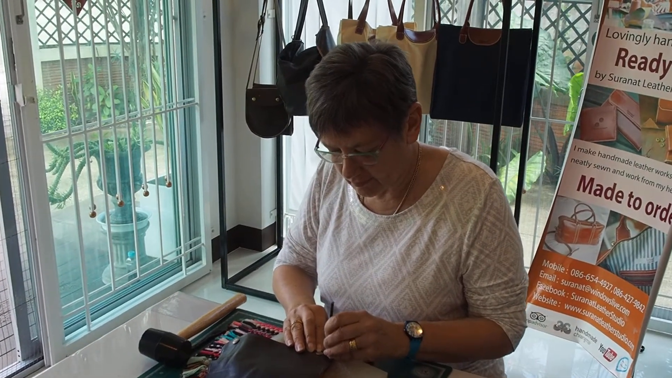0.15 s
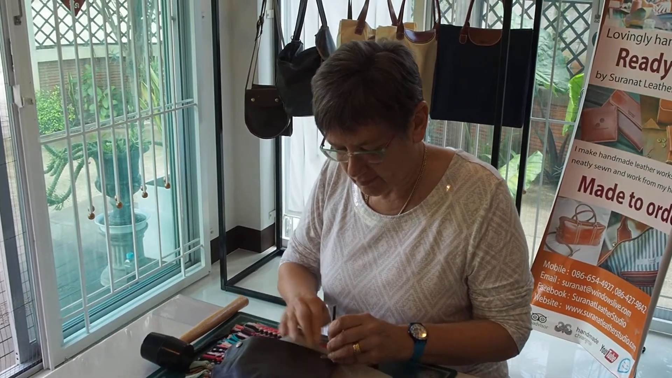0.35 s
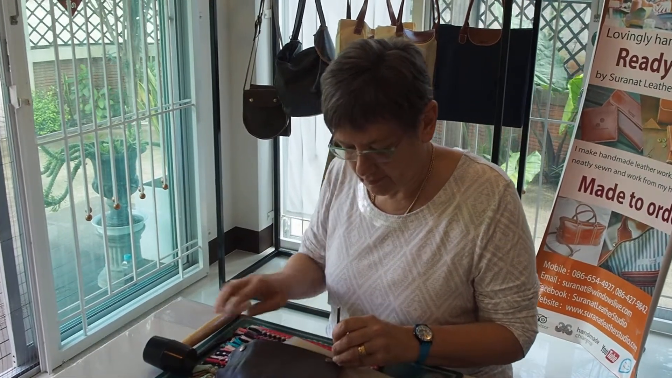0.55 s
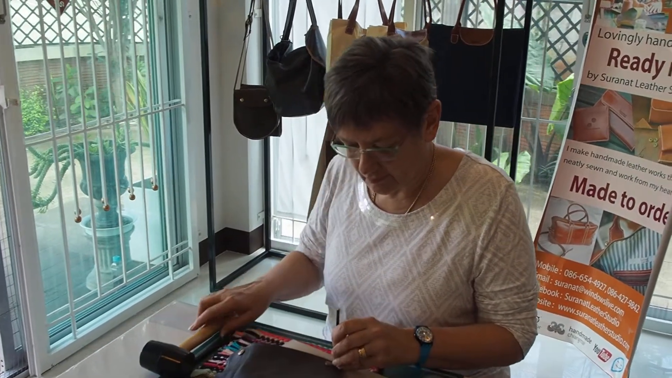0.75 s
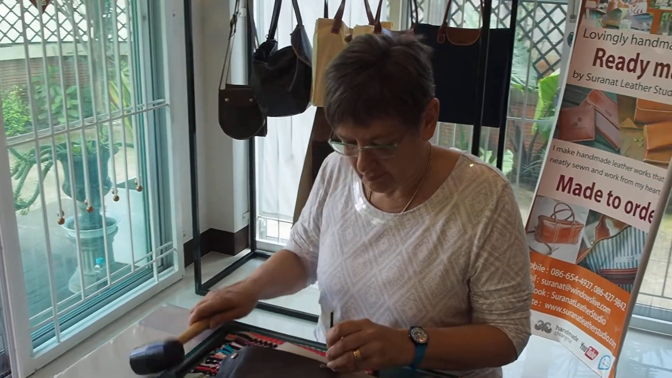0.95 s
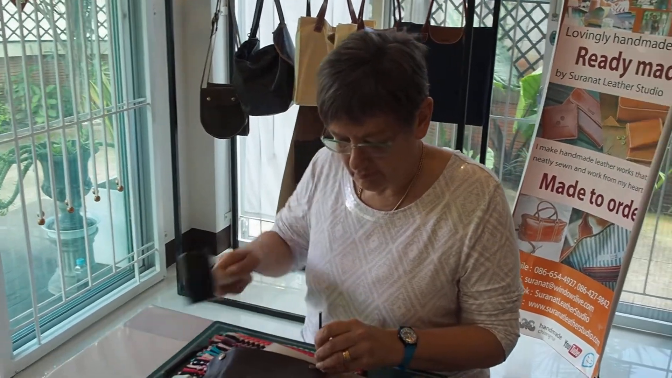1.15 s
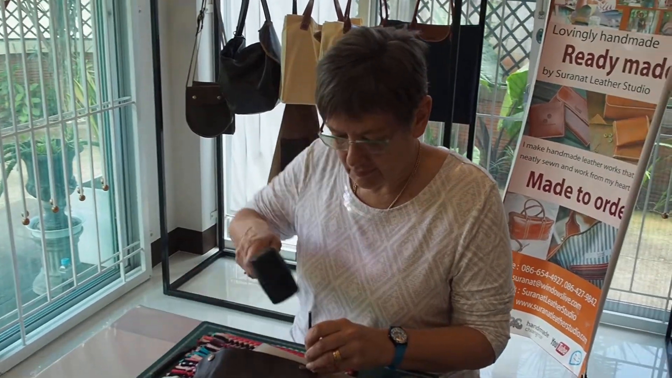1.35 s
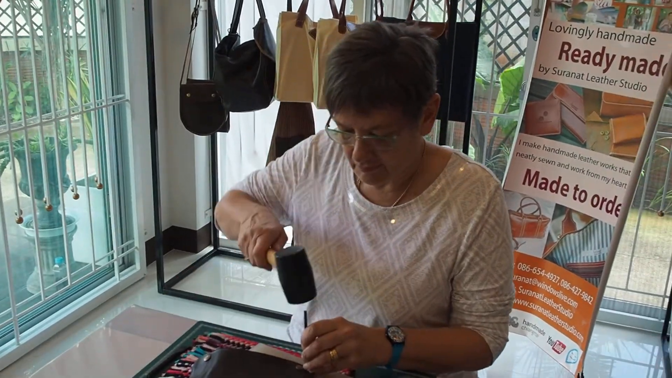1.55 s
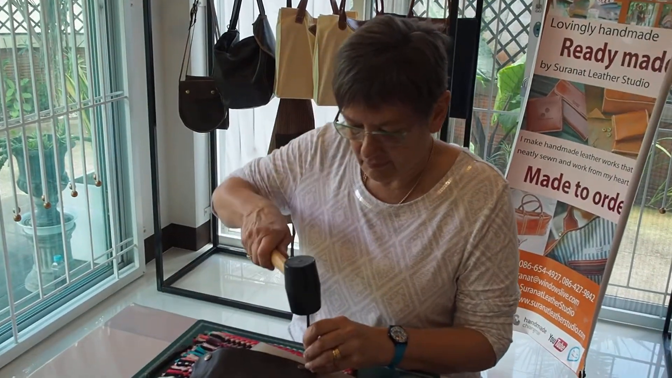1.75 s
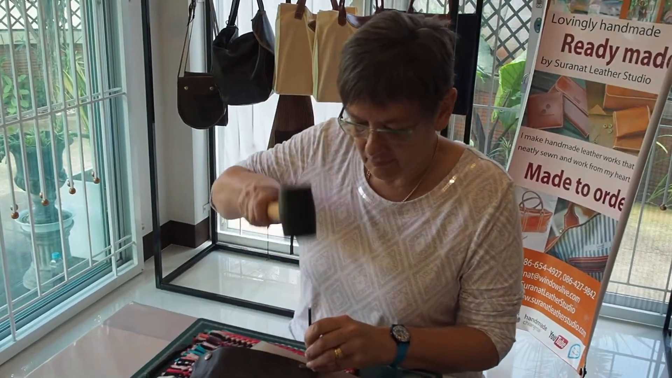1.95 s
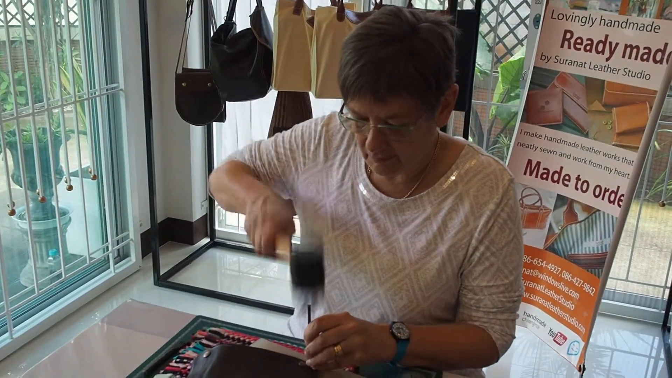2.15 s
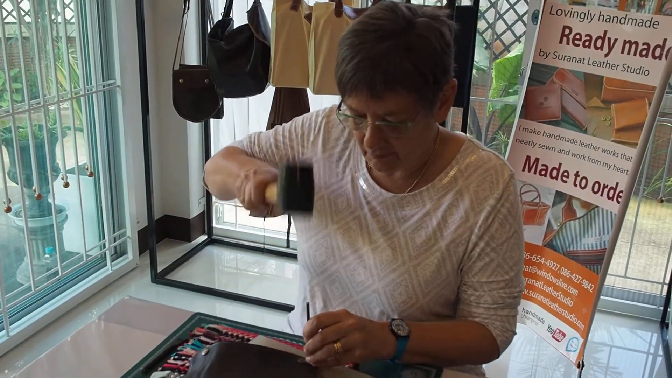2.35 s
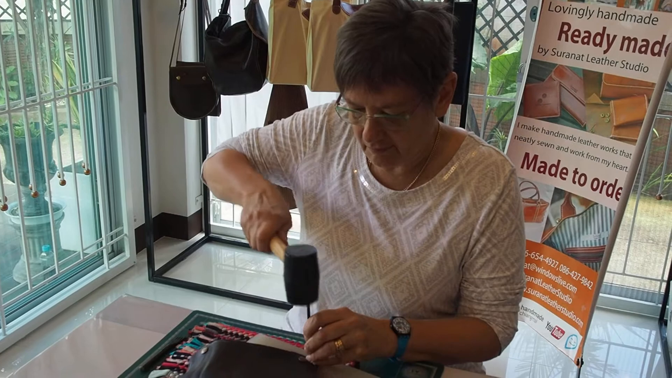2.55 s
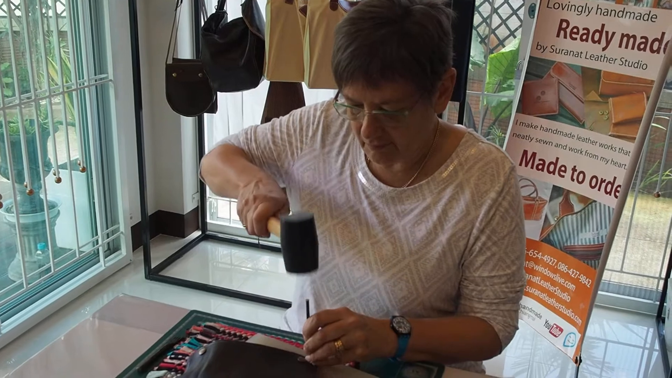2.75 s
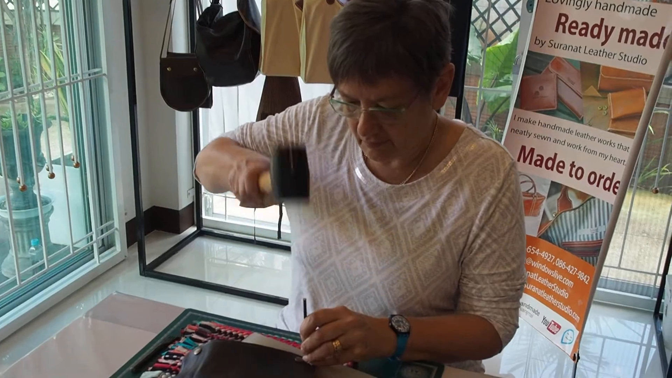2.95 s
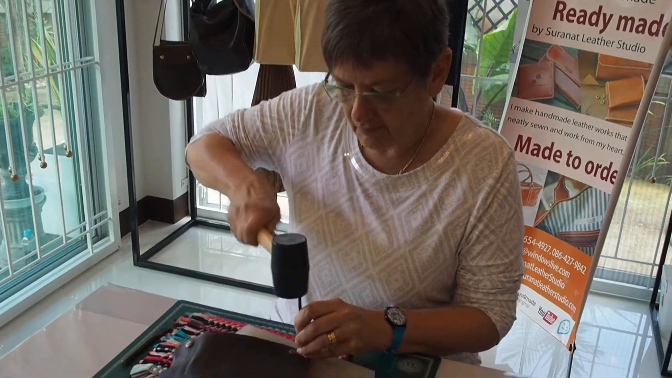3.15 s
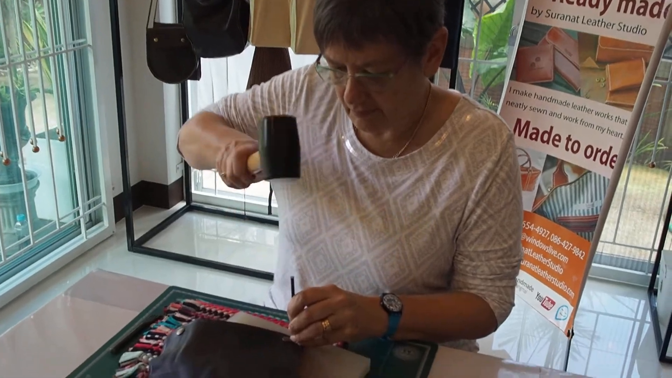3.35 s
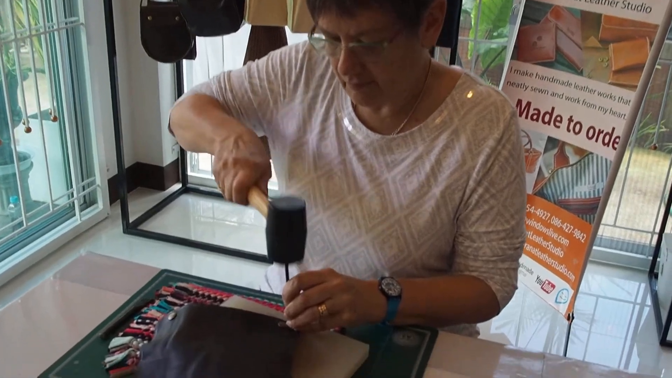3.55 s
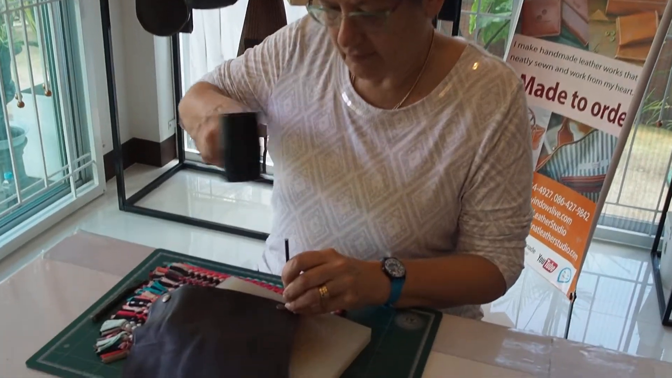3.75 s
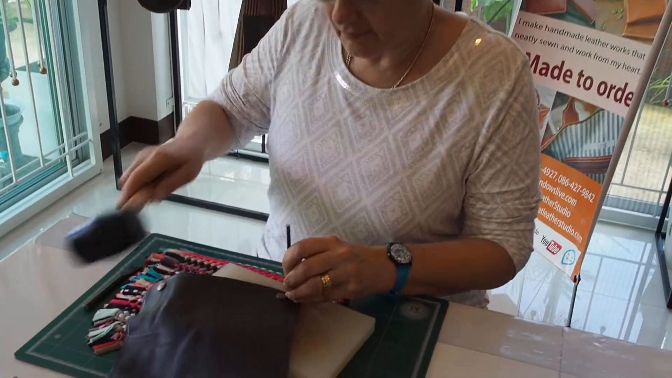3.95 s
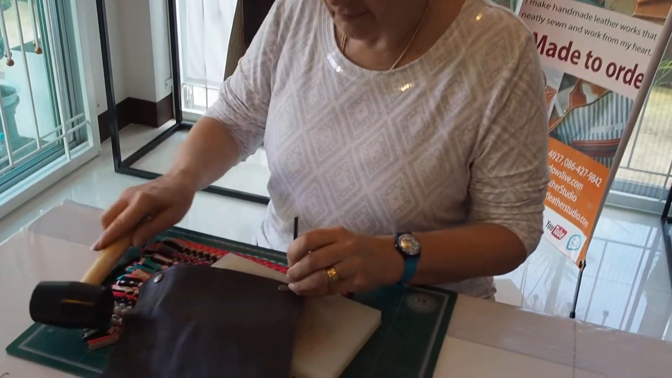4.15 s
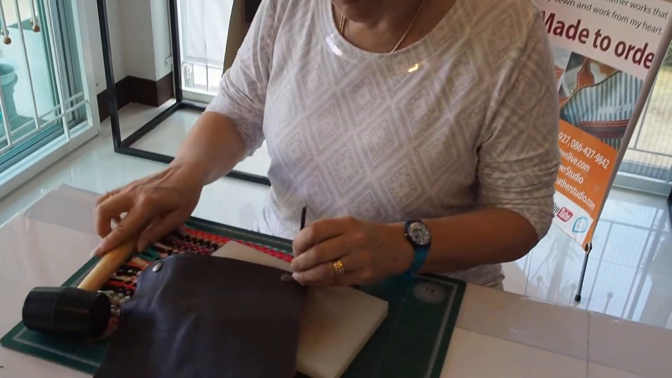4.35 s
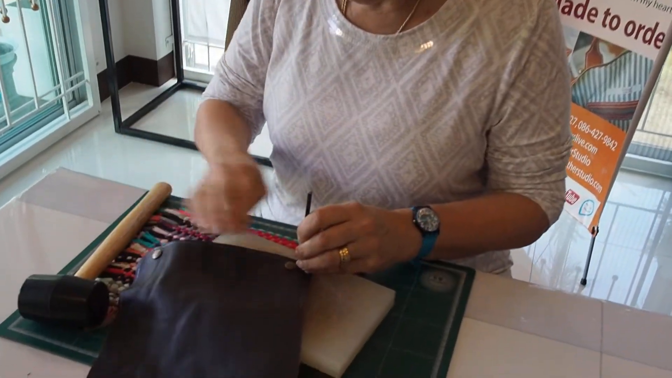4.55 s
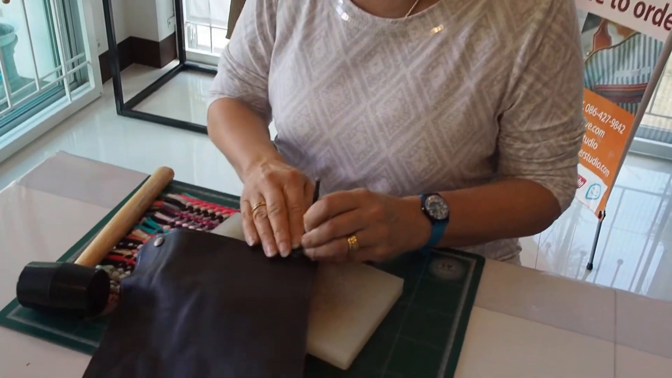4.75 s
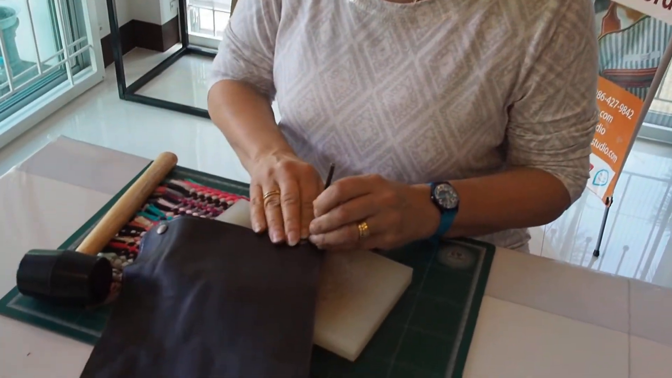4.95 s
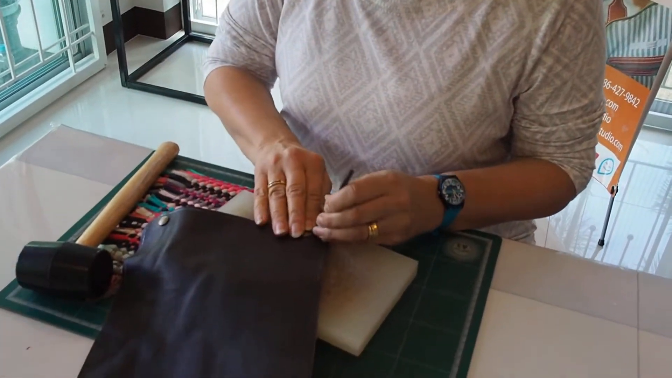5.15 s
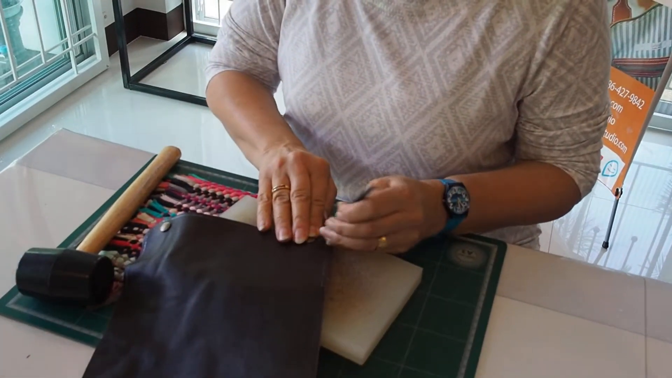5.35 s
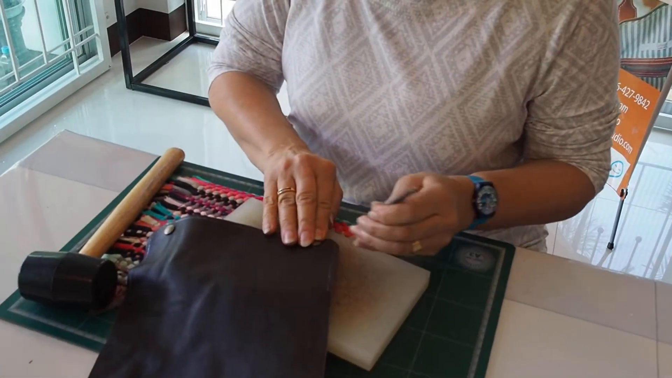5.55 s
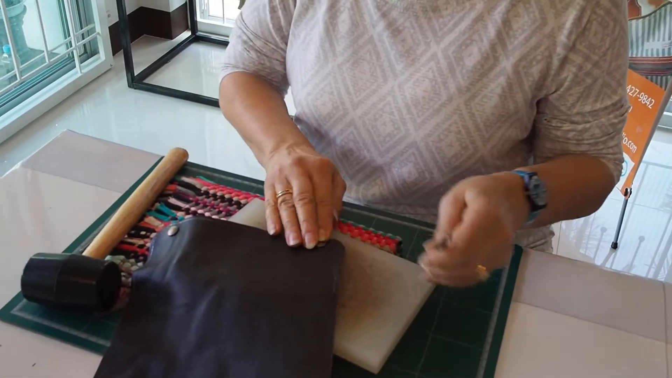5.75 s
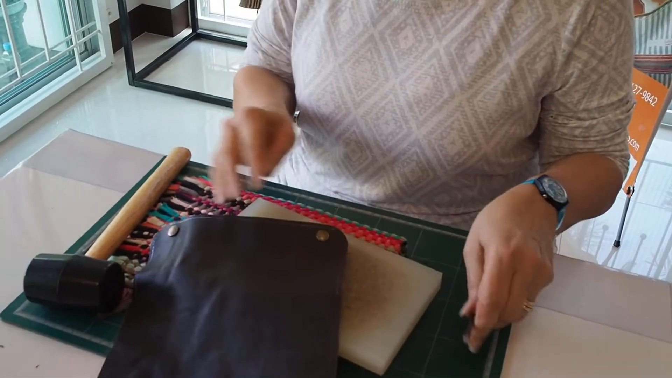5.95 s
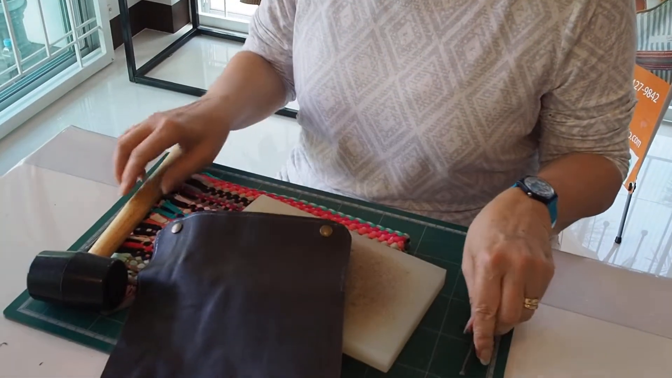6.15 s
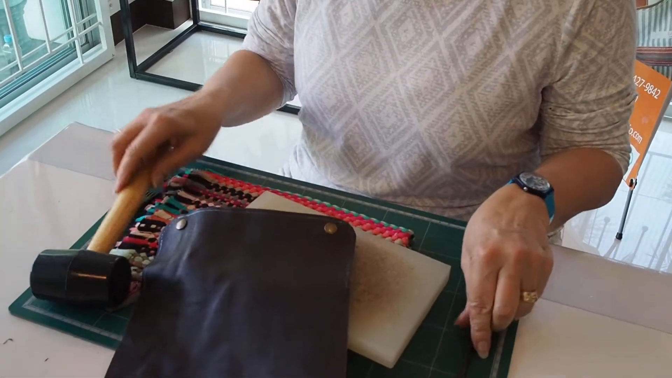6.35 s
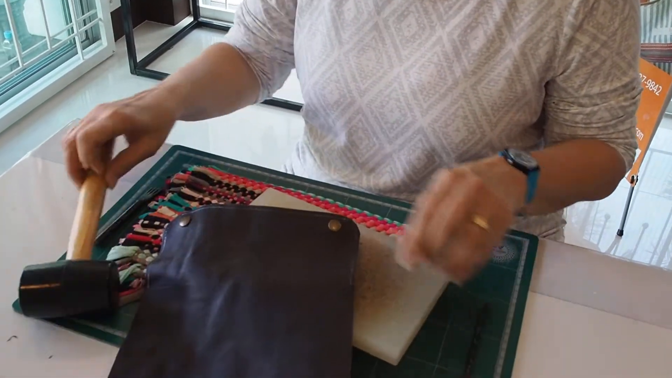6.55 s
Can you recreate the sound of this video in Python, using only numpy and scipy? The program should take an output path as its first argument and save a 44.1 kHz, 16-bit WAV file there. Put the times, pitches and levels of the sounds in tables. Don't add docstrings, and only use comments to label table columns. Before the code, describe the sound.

Quiet street wash and a low truck rumble lie under small metallic rattles and a light tap. Four sharp, overloaded mallet knocks follow, each with a woody board note, low table boom and short hard-room tail. A steady motor hum swells in. The mallet head and handle clunk down, tools tick, a hand thuds on the table and the mallet is handled again, heard on a close stereo microphone that ducks after blows.

```python
import sys
import numpy as np
from scipy import signal
from scipy.io import wavfile
from scipy.ndimage import uniform_filter1d

SR = 44100
rng = np.random.default_rng(int(sys.argv[2]) if len(sys.argv) > 2 else 0)


def attenuation_scalar(level_db):
    decades = np.asarray(level_db, float) / 20
    return 10 ** decades


def int16_out(signal):
    q = np.round(np.clip(np.atleast_2d(signal).T, -1, 1) * 32767)
    wavfile.write(sys.argv[1], SR, q.astype(np.int16))


N = 295351


def evened(x):
    return x / np.sqrt(np.mean(x ** 2) + 1e-20)


def read(points, hz):
    f, value = np.transpose(points)
    return np.interp(np.log(hz + 1), np.log(f + 1), value)


def add(mix, s, sound):
    part = mix[round(s * SR):][:len(sound)]
    part += sound[:len(part)]


def ring(modes, seconds, rise=1e-4):
    t = np.arange(int(seconds * SR)) / SR
    sines = sum(attenuation_scalar(db - 60 * t / t60) * np.sin(2 * np.pi * hz * t) for hz, db, t60 in modes)
    return sines * (1 - np.exp(-t / rise))


def diffuse(length, size, level_db):
    # f/Hz, correlation
    likeness = [(30, 0.97), (70, 0.88), (300, 0.96), (700, 0.9), (1400, 0.74), (2100, 0.38), (3800, -0.67),
                (6000, 0.11)]
    hz = np.fft.rfftfreq(size, 1 / SR)[:, None]
    t = np.arange(4 * length // size + 5) * size / 4 / SR
    a, b, c, d = rng.standard_normal((len(t), len(hz), 4)).T
    same = np.clip(read(likeness, hz), -1, 1)
    left = a + 1j * b
    right = same * left + np.sqrt(1 - same ** 2) * (c + 1j * d)
    spectra = np.array([left, right]) * attenuation_scalar(level_db(hz, t))
    return signal.istft(spectra, nperseg=size, noverlap=3 * size // 4)[1][:, :length]


def street_wash():
    # f/Hz, level/dB per Hz
    wash_colour = [(50, -42), (90, 0.5), (180, 1), (250, -8), (350, -4), (1050, 0.77), (2100, -9.5),
                   (16000, -51)]

    def level_db(hz, t):
        patches = uniform_filter1d(rng.standard_normal((len(hz), len(t))), 14, 0)
        patches = uniform_filter1d(patches, 12, 1)
        return read(wash_colour, hz) + 0.97 * evened(patches)

    return attenuation_scalar(-35.5) * evened(diffuse(N, 1024, level_db))


def truck():
    # t/s, engine note f/Hz, rumble level/dB
    passing = [(0, 70, -51), (1.8, 69.4, -46), (2.501, 72, -41.5), (3.8, 72, -38.5), (4.5, 85.9, -40),
               (6.7, 80.4, -39)]
    # f/Hz, level/dB per Hz
    rumble_colour = [(30, -5), (60, -50), (84, 6.5), (110, -0.5), (145, 1.5), (200, -15), (260, -76),
                     (400, -42)]
    engine_db, engine_width_hz = -6.5, 5.2
    sway = 0.23
    t = np.arange(N) / SR
    s, engine_hz, rumble_db = np.transpose(passing)
    rumble = evened(diffuse(N, 4096, lambda hz, t: read(rumble_colour, hz)))
    r = np.exp(-np.pi * engine_width_hz / SR)
    noise = rng.standard_normal(N) + 1j * rng.standard_normal(N)
    waver = signal.lfilter([1], [1, -2 * r, r * r], noise)
    phase = 2 * np.pi * np.cumsum(np.interp(t, s, engine_hz)) / SR
    engine = evened((waver * np.exp(1j * (phase + sway * np.array([[1], [-1]])))).real)
    return attenuation_scalar(np.interp(t, s, rumble_db)) * (rumble + attenuation_scalar(engine_db) * engine)


def cooling_motor():
    hum_hz, idle_db, run_db = 300, -51.5, -37
    start_s, spin_up_s = 3.4, 0.33
    t = np.arange(N) / SR
    running = 1 - np.exp(-np.maximum(t - start_s, 0) / spin_up_s)
    hum = np.sqrt(2) * np.sin(2 * np.pi * hum_hz * t)
    return hum * attenuation_scalar([[1.1], [-.9]]) * attenuation_scalar(idle_db + (run_db - idle_db) * running)


def bumps():
    # t/s, level/dB, f/Hz
    pushes = [(0.701, -28, 330), (1.767, -28, 70), (1.789, -24, 72), (4.287, -18, 119), (4.294, -35, 163),
              (4.299, -22, 175), (5.816, -25.5, 109), (6.057, -18.5, 94), (6.178, -26, 136.4),
              (6.252, -28, 51), (6.333, -25, 88)]
    out = np.zeros(N)
    for s, db, hz in pushes:
        u = np.arange(int(SR / hz)) * hz / SR
        add(out, s, attenuation_scalar(db) * np.sin(2 * np.pi * u) * np.sin(np.pi * u) ** 0.25)
    return out


def tail(colour, db, build=0.002):
    # f/Hz, t60/s
    room_t60 = [(100, 0.11), (400, 0.53), (900, 0.4), (2000, 0.41), (4000, 0.39), (8000, 0.33),
                (15000, 0.36)]
    length = SR * 2 // 3

    def level_db(hz, t):
        build_s = build * np.minimum(1500 / (hz + 1), 1)
        grow_db = 20 * np.log10(1.001 - np.exp(-t / build_s))
        return read(colour, hz) - 60 * t / read(room_t60, hz) + grow_db

    x = diffuse(length, 256, level_db)
    walls_answer = np.clip(np.arange(length) / SR / .003 - 1, 0, 1)
    return attenuation_scalar(db) * x / np.std(x[:, :4000]) * walls_answer


def clinks():
    # t/s, level/dB, f/Hz, t60/s
    ticks = [(.354, -36, 10800, 0.0024), (5.376, -32, 11500, 0.00088), (4.39, -33, 7340, 0.0071),
             (4.3918, -23.5, 4650, 0.0061), (5.353, -38, 6000, 0.0013), (5.375, -23, 6170, 0.00081),
             (5.836, -20.5, 3860, 0.00043), (5.836, -18.5, 6450, 0.00039), (6.241, -38, 11200, 0.0027),
             (6.262, -47, 11950, 0.045), (6.356, -55, 11950, .02), (6.261, -37, 3600, 0.011),
             (6.636, -30, 8600, 0.001)]
    # t/s, level/dB
    rattle = [
        (.689, -40.5),
        (0.704, -36.5),
        (.712, -39),
        (0.726, -45),
        (.738, -53),
    ]
    # f/Hz, level/dB, t60/s
    steel = [(4780, 0, .015), (7200, -13, .02), (9600, -14, .02)]
    rattles = [(s, db + mode_db, hz, t60) for s, db in rattle for hz, mode_db, t60 in steel]
    out = np.zeros(N)
    for s, db, hz, t60 in ticks + rattles:
        cluster = [(hz * (1 + 0.019 * e), db - 0.5, t60) for e in rng.standard_normal(4)]
        add(out, s, ring(cluster, .2))
    wet = tail([(100, 0.1), (5000, -1.0), (16000, -6)], -40.5)
    return out + signal.fftconvolve(out[None], wet, axes=1)[:, :N]


def tick(force_db, tick_hz, bright_db):
    # factor on tick f, level/dB, t60/s
    tick_modes = [(.52, -33, 0.0035), (.64, -1, 0.0068), (1.0, 14, 0.0011), (1.4, 11.5, 0.001),
                  (1.8, -15, 0.002)]
    modes = [(k * tick_hz, db + bright_db * abs(np.log2(k)), t60) for k, db, t60 in tick_modes]
    return -attenuation_scalar(force_db) * ring(modes, .02, rise=0.00017)


def knock(db, hz):
    # factor on knock f, level/dB, t60/s
    board = [(.43, -8, 0.09), (1.0, 5.5, 0.027), (1.4, 9, 0.011), (2.3, -94, 0.018), (0.928, -15, 0.35),
             (.965, -9, .25), (1.01, -12.5, 0.36), (1.059, -12.5, 0.27), (1.25, -33, .3), (1.36, -57, 0.39)]
    return attenuation_scalar(db) * ring([(k * hz, mode_db, t60) for k, mode_db, t60 in board], .5)


def table_boom(db):
    # f/Hz, level/dB, t60/s
    table_modes = [(72.9, -13, 0.81), (105.5, -7.5, 0.57), (134.2, 10, 0.4), (141, -18, 1.42),
                   (157, 0.5, 0.4), (179.5, -1, 0.53), (329.7, -2.5, 0.33), (357, -1, 0.42)]
    spread = rng.standard_normal(len(table_modes))
    modes = [(hz, mode_db + 0.65 * e, t60) for (hz, mode_db, t60), e in zip(table_modes, spread)]
    return attenuation_scalar(db) * ring(modes, 2.1, rise=0.0035)


def hits():
    # t/s, force level/dB, knock level over force/dB, knock f/Hz
    first = [
        (2.2024, 1, 12, 890),
    ]
    blows = [
        (2.5323, 2.5, 13.5, 787),
        (3.1519, 2.5, 14, 840),
        (3.4817, 2.5, 14.3, 790),
    ]
    tap = [
        (1.7667, -26.5, 1, 768),
    ]
    lift = [
        (0.9517, -22.5, 7.3, 857),
    ]
    lay = [
        (4.2875, -9, -8, 768),
        (4.2925, -24.5, 7, 300),
    ]
    handle = [
        (4.3851, -8.5, -21, 1520),
        (4.3912, -30, -21, 1590),
    ]
    grab = [
        (6.2484, -32, -4, 1120),
        (6.2612, -13, -7.5, 900),
        (6.268, -32, -18, 1310),
        (6.278, -24, -14, 1010),
        (6.3536, -22.5, -13, 856),
        (6.3900, -25, -16, 910),
    ]
    # f/Hz, level/dB per Hz
    first_tail = [(170, -15), (340, -5), (520, -12.5), (800, -3.5), (1120, -8.5), (3130, -28.5),
                  (5730, -30.5), (16000, -47.5)]
    blow_tail = [(170, -23), (340, -2.5), (520, -3.5), (790, 6), (1500, -12), (3800, -21), (6500, -33.5),
                 (16000, -45.5)]
    tap_tail = [(170, 0.5), (340, -13), (500, -28), (760, -7.5), (900, -25), (1030, -19), (9000, -49),
                (14000, -90)]
    lift_tail = [(170, -27), (340, -7), (520, 2), (690, -17), (870, 2.5), (1110, -12.5), (12000, -48),
                 (16000, -85)]
    lay_tail = [(170, 4), (340, 6.2), (900, 3), (1560, -16), (1890, -14), (3560, -22), (12000, -42),
                (16000, -83)]
    handle_tail = [(710, -33), (1200, -2), (1680, 6.5), (1910, -6), (2830, -6), (5000, -6), (9500, -19),
                   (16000, -35)]
    grab_tail = [(240, -34), (345, -8), (520, -5.5), (900, 0), (2400, -14), (4500, -16.5), (10000, -41),
                 (14000, -75)]
    # tick f/Hz, tick brightness/dB per octave, boom level over knock/dB,
    # tail level over force/dB, tail build-up/s
    kinds = [
        (3680, 1.5, -8.5, 3, 0.0017),
        (5350, -15.5, -12.5, 2.5, 0.022),
        (3720, -8, -2, 0, 0.0022),
        (3930, 16, -15, 2.8, 0.002),
        (5710, -42, -6, -6, 0.003),
        (2660, -27, -40, -21.5, 0.004),
        (3800, -4, -16.5, -12.5, 0.0017),
    ]
    # t/s, level/dB, f/Hz
    mallet_wood = [
        (.9525, -20, 458),
        (4.2875, -21.5, 316),
        (4.2878, -16, 513),
        (6.2632, -30, 1124),
    ]
    # f/Hz, width/Hz
    hollows = [(572, 107), (247, 23)]
    # delay t/s, level/dB
    echoes = [(.0059, -16), (.0100, -18)]

    contact, boom, wet = np.zeros(N), np.zeros(N), np.zeros((N, 2))
    events = [first, blows, tap, lift, lay, handle, grab]
    colours = [first_tail, blow_tail, tap_tail, lift_tail, lay_tail, handle_tail, grab_tail]
    for rows, colour, (tick_hz, bright_db, boom_db, tail_db, build) in zip(events, colours, kinds):
        for s, force_db, knock_db, knock_hz in rows:
            add(contact, s, tick(force_db, tick_hz, bright_db))
            add(contact, s + 0.00029, knock(force_db + knock_db, knock_hz))
            add(boom, s + 0.0028, table_boom(force_db + knock_db + boom_db))
            add(wet, s, tail(colour, force_db + tail_db, build).T)
    for s, db, hz in mallet_wood:
        add(contact, s, knock(db, hz))
    for hz, width in hollows:
        wet = signal.lfilter(*signal.iirnotch(hz, hz / width, SR), wet, axis=0)
    contact = signal.sosfilt(signal.butter(2, 180, "high", fs=SR, output="sos"), contact)
    contact = contact + sum(attenuation_scalar(db) * np.roll(contact, round(s * SR)) for s, db in echoes)
    stereo = np.array([np.roll(contact, 1), contact])
    return stereo + boom + wet.T


def scene():
    background = street_wash() + truck() + cooling_motor()
    return background + bumps() + clinks() + hits()


def ports(x, size=2048):
    # f/Hz, left minus right level/dB
    port_difference = [(60, 0.8), (2900, 0.6), (4700, 8), (6400, 4.5), (9000, 8), (10700, 8), (12400, -11),
                       (15500, 0.5)]
    # f/Hz, width/Hz, level/dB
    housing = [(3700, 700, 5), (7400, 1000, 3)]
    hz = np.abs(np.fft.fftfreq(size, 1 / SR))
    peaks_db = sum(db * np.exp(-((hz - f) / width) ** 2 * 2) for f, width, db in housing)
    log_gain = np.log(attenuation_scalar(peaks_db + np.outer([.5, -.5], read(port_difference, hz))))
    taps = np.fft.ifft(np.exp(np.conj(signal.hilbert(log_gain)))).real[:, :size // 2]
    return signal.oaconvolve(x, taps, axes=1)[:, :N]


def recorder_hiss():
    # f/Hz, level/dB per Hz
    hiss_colour = [(1500, -52), (3000, -3.1), (6400, -5.5), (12400, -12.5), (13500, -5.5), (15300, -5.5)]
    return ports(attenuation_scalar(-49) * evened(diffuse(N, 1024, lambda hz, t: read(hiss_colour, hz) + 0 * t)))


def low_pass(x):
    return signal.sosfilt(signal.butter(12, 17060, fs=SR, output="sos"), x)


def record(dry):
    quick, climb_db_per_s = 0.0034, 82.0
    duck, hiss_duck = 0.84, 0.22
    offset, edge_hz = -.0045, 15850
    x = signal.sosfilt(signal.butter(2, 45, "high", fs=SR, output="sos"), ports(dry))
    power = signal.lfilter([quick], [1, quick - 1], (x ** 2).mean(0))
    power_db = 10 * np.log10(power + 1e-12)
    climb = np.arange(N) * climb_db_per_s / SR
    held_db = np.maximum.accumulate(power_db + climb) - climb
    over_db = np.maximum(held_db + 13.0, 0)
    x = x / attenuation_scalar(duck * over_db) + recorder_hiss() / attenuation_scalar(hiss_duck * over_db) + offset
    clipped = np.clip(1.03 * x / (1 + np.abs(x) ** 8) ** .125, -1, 1)
    finished = signal.oaconvolve(clipped, signal.firwin(255, edge_hz, fs=SR)[None], "same")
    return low_pass(finished)


dry = scene()
out = record(dry)
int16_out(out)
```